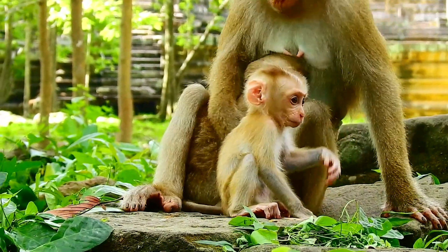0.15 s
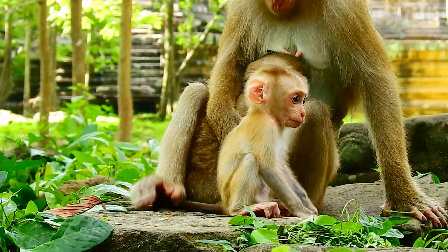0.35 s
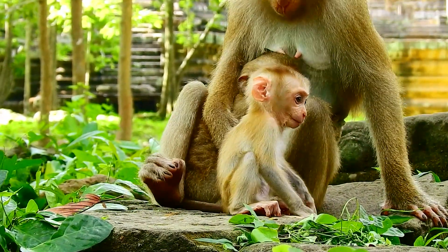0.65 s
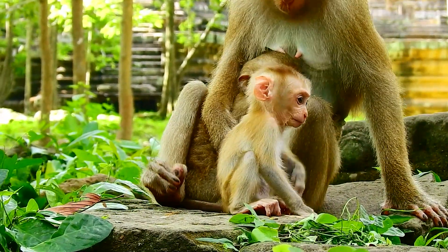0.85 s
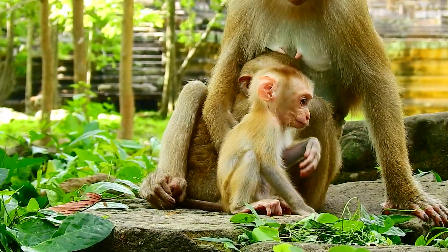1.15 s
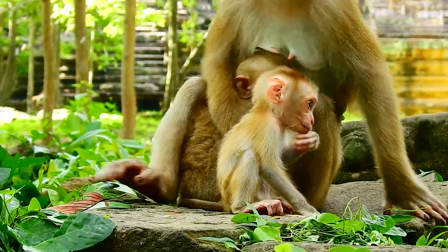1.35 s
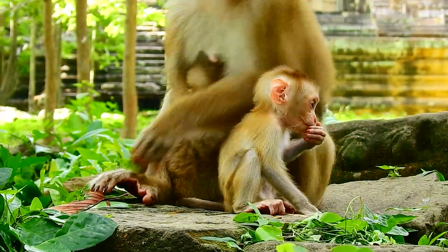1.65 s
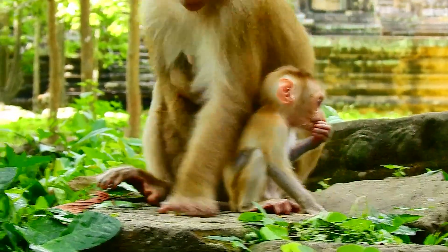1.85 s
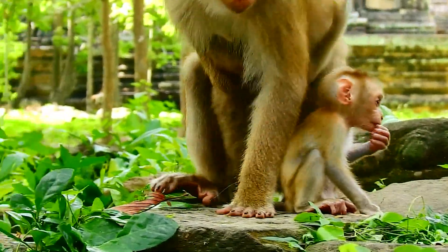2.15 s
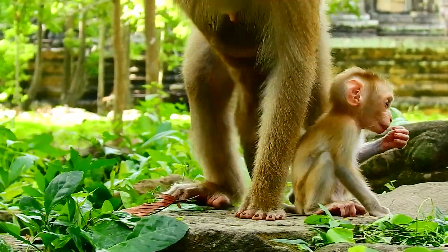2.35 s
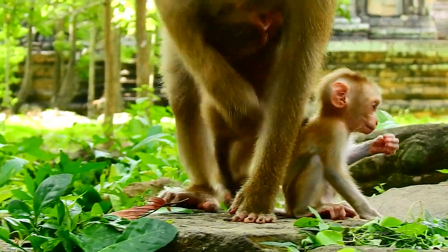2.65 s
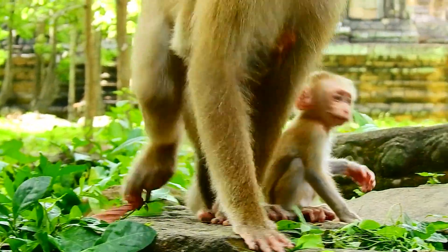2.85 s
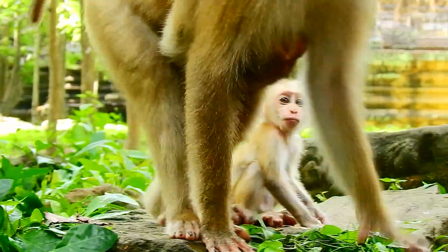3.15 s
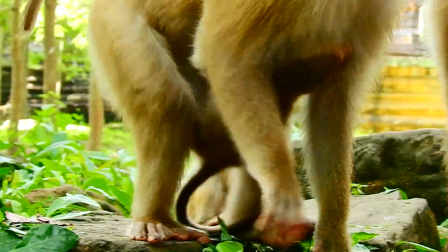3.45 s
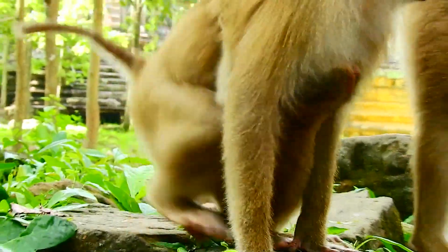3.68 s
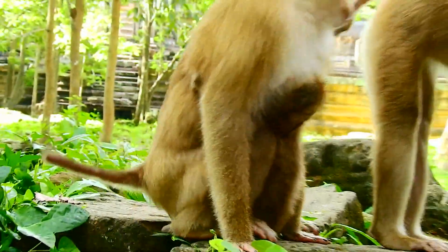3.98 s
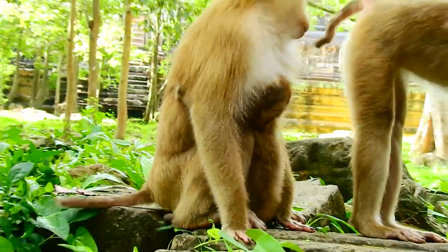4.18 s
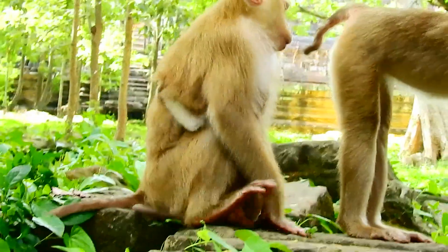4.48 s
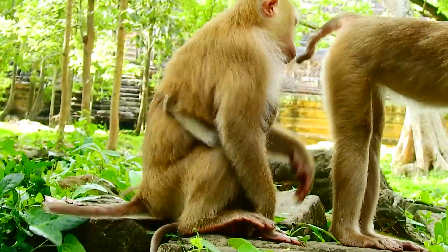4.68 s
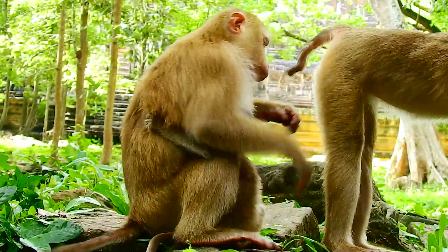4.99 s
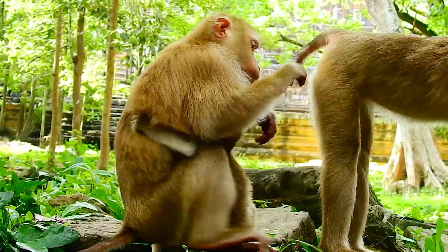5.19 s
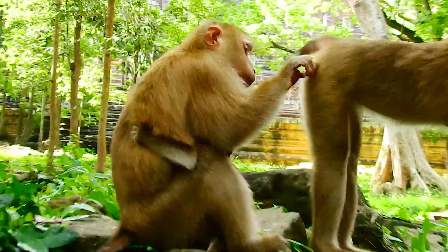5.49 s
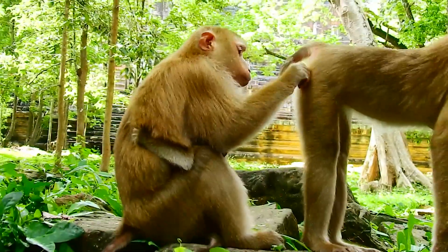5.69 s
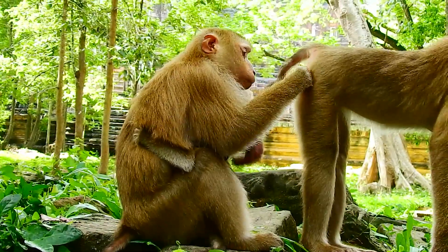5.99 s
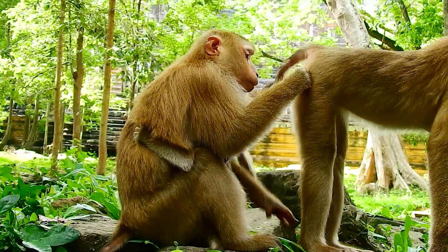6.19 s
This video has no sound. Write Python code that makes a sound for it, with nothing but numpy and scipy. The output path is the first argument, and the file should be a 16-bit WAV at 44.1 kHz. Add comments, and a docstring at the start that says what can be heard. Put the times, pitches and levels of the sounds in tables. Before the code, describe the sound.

A quiet forest, recorded close in stereo: low air rumble, faint hiss and a thin high cicada drone, strongest at the start. From 0 to 0.33 s an infant monkey gives a thin, wavering nasal whine. A harsh squeal at 0.34 s leaps into a piercing shriek, with another squeal at 0.53. Short chirps and a rising squeak follow around 0.8-1.1, then sparser chirps at 1.5, 1.75 and 2.5. A high whistle at 2.65 leads to a loud bright chirp at 2.9 and a rough upward scream at 2.97, with a last chirp at 3.1. A soft distant coo stretches from 3.5 to 4.2, a sharp knock on stone lands at 3.9, and light taps and scuffs continue to 6.1. Another dull coo comes at 5.1 and a faint rising call at 6.26. A distant bird repeats its whistled note from 0.6 to 2.5 and again from 4.4 to 5.8.

```python
"""Macaques squeak close by on a stone ledge: a thin whine, harsh shrieks, then short chirps and whistles.
Their voices are sums of harmonics shaped by throat and mouth, breaking into noise when rough.
Taps and scuffs are short bursts of shaped noise; softer, duller coos come from callers further off.
A bird repeats one whistled note, which rises, holds and drops, and cicadas drone in a narrow band.
Decaying noise gives the trees a light echo."""
import sys
import numpy as np
from scipy import signal
from scipy.fft import rfft, irfft
from scipy.io import wavfile

SR = 44100
rng = np.random.default_rng(int(sys.argv[2]) if len(sys.argv) > 2 else 0)


def dump(signal):
    """Clip the signal to [-1, 1] and save it as 16-bit WAV at the path in sys.argv[1]."""
    limited = np.clip(np.atleast_2d(signal).T, -1, 1)
    pcm = np.round(limited * 32767).astype(np.int16)
    wavfile.write(sys.argv[1], SR, pcm)


N = 279153  # length in samples


def undb(db):
    """Turn decibels into gain."""
    return 10 ** (np.asarray(db) / 20)


def unit(x):
    """Scale to an rms level of 1."""
    return x / (x.std() + 1e-12)


def along(hz, points):
    """Read (Hz, value) points on a log-frequency axis."""
    f, value = np.transpose(points)
    return np.interp(np.log(np.maximum(hz, 1)), np.log(f), value)


def noise(size, gain):
    """Noise of rms 1 whose spectrum follows gain(Hz)."""
    spectrum = rfft(rng.standard_normal(size)) * gain(np.fft.rfftfreq(size, 1 / SR))
    return unit(irfft(spectrum, size))


def wobble(size, rate_hz):
    """Random motion, mostly slower than about rate_hz."""
    return noise(size, lambda f: 1 / (1 + (f / rate_hz) ** 2))


def waver(s, rate_hz):
    """Random motion up to about rate_hz, read at the times s of one call."""
    return np.interp(s - s[0], np.arange(SR) / SR, wobble(SR, rate_hz))


def resonance(f, hz, width_hz):
    """Gain of one resonance, 1 at its centre."""
    return 1 / np.sqrt(1 + ((f * f - hz * hz) / (np.maximum(f, 1) * width_hz)) ** 2)


def add(track, s, sound):
    """Mix a sound into a track at time s."""
    start = int(np.clip(s * SR, 0, N - 1))
    track[start:start + len(sound)] += sound[:N - start]


# Colour of the forest air. Each row: frequency in Hz, relative strength in dB.
AIR_COLOUR = [(22, -45), (40, -10.5), (60, 3.5), (85, -5), (125, 2), (200, -11.5), (330, -22.5), (600, -26),
              (1200, -28.5), (2500, -30.5), (4400, -31.5), (5400, -23), (6500, -28.5), (7600, -27.5),
              (10000, -38), (15000, -59.5)]
# Colour of the cicada drone. Each row: frequency in Hz, relative strength in dB.
CICADA_COLOUR = [(7700, -39), (8000, -15.5), (8100, -11), (8350, -6.5), (8560, 2), (8700, -4.5), (8790, -1),
                 (8920, -29), (9150, -40)]
# How loud the cicada chorus is. Each row: time in seconds, level in dB around which it throbs.
CICADA_LEVEL = [(0, -57.5), (1.3, -64), (2.2, -64), (3.5, -63), (4.6, -65.5), (6.3, -64)]


def forest(air_db=-62.5, cicada_db=0, cicada_side_db=-7, throb_db=-0.5):
    """Low rumble and faint hiss of the open air, under a narrow band of throbbing cicadas."""
    f = np.fft.rfftfreq(N, 1 / SR)

    def spread(points, side_gain):
        """Stereo noise: a shared middle, plus a side part with opposite sign left and right."""
        gain = undb(along(f, points))
        mid, side = (rfft(rng.standard_normal(N)) * gain for _ in range(2))
        return unit(irfft(mid + side_gain * side * np.array([[1], [-1]]), N))

    # long waves are alike at both ports, short ones differ
    air = spread(AIR_COLOUR, np.minimum(f / 900, .55)) * undb(air_db + 0.67 * wobble(N, 1.8))
    level_db = np.interp(np.arange(N) / SR, *np.transpose(CICADA_LEVEL))
    chorus_db = level_db + cicada_db + throb_db * wobble(N, 40)
    return air + spread(CICADA_COLOUR, undb(cicada_side_db)) * undb(chorus_db)


def trees(x, t60_s, thin_hz, dull_hz):
    """Trunks and leaves scatter short waves best; the echoes differ at each ear."""
    t = np.arange(SR) / SR
    fade = undb(-60 * t / t60_s) * (1 - np.exp(-t / 0.0021))

    def colour(f):
        return f ** 2 / (f ** 2 + thin_hz ** 2) / np.hypot(1, f / dull_hz)

    tails = [fade * noise(SR, colour) for _ in range(2)]
    return np.array([signal.fftconvolve(x, tail / np.linalg.norm(tail))[:N] for tail in tails])


# The shape of one bird note.
# Each row: seconds from its start, share of the top pitch, level in dB relative to the note.
BIRD_NOTE = [(0, .82, -27), (0.024, .915, -6.5), (0.052, 1, -4.5), (0.076, 0.99, -2), (0.111, 1, -1),
             (.135, 0.95, -15), (0.161, 0.9, -46)]
# When the bird sings. Each row: start in seconds, top pitch in Hz before flutter, relative level in dB.
BIRD_TIMES = [(0.61, 3340, -48.5), (1.168, 3356, -49.5), (1.727, 3304, -45.5), (2.366, 3270, -47),
              (4.421, 3358, -51.5), (5.013, 3267, -50), (5.656, 3327, -52.5)]


def bird(flutter_db=1):
    """A nearly pure whistle that rises, holds and drops away, fluttering on its way through the leaves."""
    out = np.zeros(N)
    s, pitch, db = np.transpose(BIRD_NOTE)
    t = np.arange(int(s[-1] * SR)) / SR
    for start, top_hz, note_db in BIRD_TIMES:
        hz = top_hz * np.interp(t, s, pitch) * (1 + 0.0034 * wobble(len(t), 93))
        loudness = undb(note_db + np.interp(t, s, db) + flutter_db * wobble(len(t), 50))
        add(out, start, np.sqrt(2) * np.sin(2 * np.pi * np.cumsum(hz) / SR) * loudness)
    return out


TOP_HZ = 15600  # highest harmonic, and where the recorder cuts
MOUTH_WIDTH_HZ, MOUTH_DB = 600, 19.5  # half-width and height of the mouth resonance


def cry(rows, throat, breath, jitter_hz=190, unrest_hz=900, shimmer=0.34, hiss_treble_db=4):
    """Vocal folds drive throat and mouth; under strain their cycles turn uneven and break into noise."""
    s, *columns = np.transpose(rows)
    size = max(int((s[-1] - s[0]) * SR), 256)
    t = np.arange(size) / SR
    hz, db, rough, mouth_hz, treble_db = (np.interp(s[0] + t, s, c) for c in columns)
    rough = np.clip(rough, 0, 1)

    def tract(f, mouth, treble):
        """Gain of throat, mouth resonance and a treble step around 5200 Hz."""
        mouth_db = MOUTH_DB / (1 + ((f - mouth) / MOUTH_WIDTH_HZ) ** 2)
        step_db = treble / (1 + np.exp((5200 - f) / 350))
        return undb(along(f, throat) + mouth_db + step_db)

    harmonic = np.arange(1, 15)[:, None]
    uneven_hz = hz + jitter_hz * rough * wobble(size, unrest_hz)
    phase = 2 * np.pi * np.cumsum(uneven_hz) / SR
    weight = tract(harmonic * hz, mouth_hz, treble_db) * (harmonic * hz < TOP_HZ)
    tone = np.sqrt(2) * (weight * np.sin(harmonic * phase)).sum(0) / np.linalg.norm(weight, axis=0)

    # the noisy part is brighter than the tone and dies away below the pitch
    strain = rough * undb(db) + 1e-9
    pitch, mouth, treble = (np.average(c, weights=strain) for c in (hz, mouth_hz, treble_db))
    floor_hz = np.minimum(.85 * pitch, 4200)
    hiss = noise(size, lambda f: tract(f, mouth, treble + hiss_treble_db) * np.minimum(f / floor_hz, 1) ** 4)

    hiss_share = np.clip(np.hypot(breath, 1.1 * rough ** 1.2), 0, .92)
    flutter = np.exp(shimmer * rough * wobble(size, 430) - (shimmer * rough) ** 2)
    edges = np.clip(np.minimum(t, t[-1] - t) / 0.0012, 0, 1)
    voice = np.sqrt(1 - hiss_share ** 2) * tone + hiss_share * hiss
    return voice * flutter * edges * undb(db)


def voices(calls, throat, breath):
    """A series of cries from one kind of throat, thinned below the first frequency in its table."""
    out = np.zeros(N)
    for rows in calls:
        add(out, rows[0][0], cry(rows, throat, breath))
    return signal.sosfilt(signal.butter(4, throat[0][0], "high", fs=SR, output="sos"), out)


EDGE_DB = 15.5  # how far a call drops at its two ends


def arch(start, length, first_hz, middle_hz, last_hz, db, swell_db, attack, release):
    """Time, pitch and level of one call: a single bend in pitch; attack, a swelling or sinking hold, release."""
    u = np.linspace(0, 1, 64)
    hz = np.polyval(np.polyfit([0, .5, 1], [first_hz, middle_hz, last_hz], 2), u)
    ends = np.maximum(1 - u / attack, 0) ** 2 + np.maximum(1 - (1 - u) / release, 0) ** 2
    return start + length * u, hz, db + swell_db * (u - .5) - EDGE_DB * ends


def controls(s, hz, db, rough, mouth_hz, treble_db):
    """One cry as rows: seconds, pitch in Hz, level in dB, roughness, mouth resonance in Hz, treble in dB."""
    return np.column_stack(np.broadcast_arrays(s, hz, db, rough, mouth_hz, treble_db))


FAR_ROUGH, FAR_TREBLE_DB = 0.19, -14
FAR_WAVER, FAR_WAVER_HZ = 0.011, 14  # pitch waver as a share, and its rate


def far_call(row, attack=0.16, release=0.11):
    """A soft, dull coo whose pitch wavers a little."""
    *shape, mouth_hz = row
    s, hz, db = arch(*shape, attack, release)
    wavering_hz = hz * (1 + FAR_WAVER * waver(s, FAR_WAVER_HZ))
    return controls(s, wavering_hz, db, FAR_ROUGH, mouth_hz, FAR_TREBLE_DB)


# Calls from further off. Each row: start in seconds, length in seconds, pitch in Hz at start, middle
# and end before wavering, relative level in dB, swell in dB, mouth resonance in Hz.
FAR_CALLS = [ (1.943, 0.24, 510, 475, 477.4, -73.5, -12, 1396),
             (3.478, 0.73, 1052, 1061, 1062, -65.5, -7.5, 1050),
             (5.076, 0.15, 717, 697, 560, -66, -16.5, 1197), (6.263, .08, 1530, 1965, 2630, -65, 0, 2100)]
# Throat colour of the distant callers. Each row: frequency in Hz, relative strength in dB.
FAR_THROAT = [(450, 4), (1000, -2.5), (2000, -17.5), (3500, -13.5), (8000, -38)]


def far_callers():
    """Distant monkeys call with a breathy voice, its harmonics coloured by their own throat."""
    return voices(map(far_call, FAR_CALLS), FAR_THROAT, breath=0.12)


# Hands and feet on the ledge. Each row: start in seconds, relative knock level in dB, knock pitch in Hz,
# relative tick level in dB, relative thud level in dB.
TAPS = [(1.274, -52, 925, -65, -77), (3.491, -59, 640, -82.5, -47), (3.548, -46, 895, -70, -44),
        (3.902, -29.5, 1094, -30, -43.5), (4.569, -48, 930, -54, -54.5), (4.756, -84, 1498, -55, -77),
        (5.186, -46, 1220, -37.5, -43.5), (5.468, -48, 641, -63, -66), (5.802, -44.5, 1444, -77, -46),
        (6.074, -49, 630, -58, -52.5)]
# What a tap rings with. Each row: multiple of the knock pitch, width as a share of its own pitch
# (the peak is then squared, so sharper), relative strength in dB.
KNOCK_RINGS = [(0.699, 0.18, 0), (1.001, 0.24, 10.5), (1.498, 0.1, -39), (1.899, 0.39, -11),
               (2.8, 0.16, -17), (4, 0.25, -18)]
# Fur and limbs brushing over stone and leaves. Each row: start in seconds, length in seconds,
# centre in Hz, width in Hz before squaring, relative level in dB.
SCUFFS = [(3.774, 0.057, 352, 119, -58.5), (3.802, 0.19, 1870, 498, -64.5), (4.308, 0.053, 966, 348, -65),
          (4.414, 0.066, 1200, 700, -63), (4.454, 0.062, 900, 402, -60), (4.58, 0.084, 400, 164, -61),
          (5.182, 0.018, 1930, 915, -44), (5.416, 0.18, 1004, 345, -63.5), (5.458, 0.14, 505, 304, -60),
          (5.663, 0.061, 900, 298, -66), (5.754, 0.074, 1060, 298, -59), (5.815, 0.051, 1090, 888, -59.5),
          (5.972, 0.22, 2700, 704, -67), (6.074, 0.045, 538, 302, -64)]


def movements(knock_s=0.0096, tick_s=0.004, thud_hz=235, thud_s=0.019):
    """Each tap is a short knock, a gritty tick and a late low thud; scuffs swell and fade."""
    out = np.zeros(N)
    t = np.arange(SR // 6) / SR
    contact = np.minimum(t / 0.001, 1)
    knock_fade = np.exp(-(t / knock_s) ** 2 / 2)
    tick_fade = np.exp(-(t / tick_s) ** 2 / 2)
    thud_swell = np.exp(-t / thud_s) * np.minimum(t / 0.0087, 1) * 1.53
    for s, knock_db, hz, tick_db, thud_db in TAPS:
        knock = noise(len(t), lambda f: sum(
            undb(db) * resonance(f, m * hz, w * m * hz) ** 2 for m, w, db in KNOCK_RINGS))
        tick = noise(len(t), lambda f: resonance(f, 5800, 7100) ** 2 / (1 + (f / 10500) ** 8))
        thump = noise(len(t), lambda f: resonance(f, 288, 540) ** 2)
        thud = np.sin(2 * np.pi * thud_hz * t) + .5 * thump
        add(out, s, contact * undb(knock_db) * knock * knock_fade)
        add(out, s, contact * undb(tick_db) * tick * tick_fade)
        add(out, s, undb(thud_db) * thud * thud_swell)
    for s, length, hz, width_hz, db in SCUFFS:
        size = int(length * SR)
        brush = noise(size, lambda f: resonance(f, hz, width_hz) ** 2)
        add(out, s, undb(db + 3.15 * wobble(size, 39)) * signal.windows.tukey(size, .7) * brush)
    return out


WHINE_MOUTH_HZ = 4580
WHINE_ROUGH, WHINE_TREBLE_DB = 0.13, 5.5  # as it begins
WHINE_CALM_S, WHINE_DULL_DB_PER_S = .3, 30  # it turns cleaner and duller as it goes on
WHINE_FADE_DB, WHINE_FADE_S = 5, 0.014  # it dies away at the end
# An infant's whine. Each row: time in seconds, pitch in Hz, relative level in dB before the end fade.
WHINE = [(0.0, 997, -38), (0.014, 1005, -45.5), (0.024, 970.7, -43.5), (0.034, 970, -45.5),
         (0.07, 1077, -38.5), (0.108, 1026, -47.5), (0.19, 1130, -42), (0.228, 1117, -49.5),
         (0.254, 1088, -41.5), (0.3, 1094, -45.5), (0.316, 1045, -45.5), (0.33, 970, -38)]
# Throat colour of the infant. Each row: frequency in Hz, relative strength in dB.
INFANT_THROAT = [(1050, -13), (2150, -22.5), (3300, -13), (4300, -9.5), (5400, -30.5), (6500, -14.5),
                 (7600, -6), (8700, -13), (10800, -6), (13000, -14.5), (15500, -28.5)]


def whine():
    """The infant holds its mouth still while the strain ebbs away."""
    s, hz, db = np.transpose(WHINE)
    fade_db = WHINE_FADE_DB * np.exp((s - s[-1]) / WHINE_FADE_S)
    rough = WHINE_ROUGH * np.exp(-s / WHINE_CALM_S)
    treble_db = WHINE_TREBLE_DB - WHINE_DULL_DB_PER_S * s
    rows = controls(s, hz, db - fade_db, rough, WHINE_MOUTH_HZ, treble_db)
    return voices([rows], INFANT_THROAT, breath=0.07)


TREMOR_HZ, TREMOR_SHARE, TREMOR_DB = 54.6, .008, 2.52  # rate, share of pitch, change in level


def tremble(s, hz, db):
    """Unsteady effort moves pitch and level together."""
    effort = waver(s, TREMOR_HZ)
    return s, hz * (1 + TREMOR_SHARE * effort), db + TREMOR_DB * effort


CHIRP_ATTACK, CHIRP_RELEASE = 0.3, 0.46  # shares of its length
MOUTH_FOLLOW = 2.2  # octaves that the mouth resonance moves per octave of pitch
CHIRP_FRAY = .8  # roughness grows through a chirp by this share


def chirp(row):
    """The mouth opens and closes with the pitch, and the voice frays towards the end."""
    *shape, rough, mouth_hz, treble_db = row
    s, hz, db = tremble(*arch(*shape, CHIRP_ATTACK, CHIRP_RELEASE))
    fray = 1 + CHIRP_FRAY * np.linspace(-.5, .5, len(s))
    moving_mouth_hz = mouth_hz * (hz / np.median(hz)) ** MOUTH_FOLLOW
    return controls(s, hz, db, rough * fray, moving_mouth_hz, treble_db)


WIDEST_MOUTH_HZ = 4600  # the mouth follows the pitch until it can open no further
HIGH_PITCH_HZ, HIGH_TREBLE_DB, BRIGHTEN_DB_PER_OCTAVE = 4540, -7.5, 26  # treble at that pitch, and its climb


def high_register(s, hz, db, rough):
    """The mouth rings on the pitch up to its widest opening, and the voice brightens as it climbs."""
    treble_db = HIGH_TREBLE_DB + BRIGHTEN_DB_PER_OCTAVE * np.log2(hz / HIGH_PITCH_HZ)
    return controls(s, hz, db, rough, np.minimum(hz, WIDEST_MOUTH_HZ), treble_db)


SQUEAL_ATTACK, SQUEAL_RELEASE = .18, 0.35  # shares of its length


def squeal(row):
    """A short burst on nearly one pitch, harsher the rougher it is."""
    *shape, rough = row
    return high_register(*tremble(*arch(*shape, SQUEAL_ATTACK, SQUEAL_RELEASE)), rough)


# Short chirps in the low register. Each row: start in seconds, length in seconds, pitch in Hz at start,
# middle and end before trembling, relative level in dB, swell in dB, mean roughness from 0 to 1,
# mouth resonance in Hz at the median pitch, treble in dB.
CHIRPS = [ (0.536, 0.021, 1674, 1553, 1310, -40, -15.5, 0.52, 3080, -13.5),
          (0.815, 0.04, 1010, 1088, 1108, -35.5, 9, .12, 3000, -4),
          (1.087, 0.027, 1386, 1345, 1223, -39, -7, 0.3, 4050, -18.5),
          (1.52, 0.046, 1154, 1553, 1530, -31.5, 3.5, 0.18, 2580, 2),
          (1.74, 0.026, 1690, 1534, 1290, -35, -6.5, 0.24, 3050, -6.5),
          (2.479, 0.033, 1182, 1398, 1407, -31, 11, 0.15, 1550, 16.5),
          (2.741, 0.03, 1370, 1210, 1003, -39, 10, .15, 2590, -20),
          (2.815, 0.009, 1090, 1130, 1080, -39, -8, 0.29, 2037, -27),
          (2.906, 0.07, 1260, 1588, 1687, -22.5, 2.5, 0.11, 4300, 1.5),
          (3.099, .034, 1420, 1256, 975, -27.5, 0, .22, 3700, -1)]
# Squeals in the high register. Each row: start in seconds, length in seconds, pitch in Hz at start,
# middle and end before trembling, relative level in dB, swell in dB, roughness from 0 to 1.
SQUEALS = [ (0.341, 0.055, 4382, 4235, 4430, -22.5, -1.5, 0.7),
           (0.527, 0.031, 3984, 4380, 4300, -26.5, -11, 0.33),
           (1.039, 0.011, 7250, 6830, 6500, -43, 0, 0.2)]
# Long screams and whistles, mostly gliding upward, one list of rows for each.
# Each row: time in seconds, pitch in Hz, relative level in dB, roughness from 0 to 1.
SCREAMS = [
    [(.417, 4000, -24.5, 0.5), (.426, 4510, -28, 0.25), (.436, 6200, -22.5, 0.76), (.452, 8340, -27, 0.85),
     (.469, 8790, -26, 0.22), (.481, 8570, -24, 0.03), (.496, 8860, -31, 0.2), (.506, 9050, -40, 0.1)],
    [(.896, 3737, -28.5, 0.54), (.907, 3790, -21.5, 0.23), (.936, 4360, -30.5, 0.47),
     (.944, 6100, -40, 0.4), (.951, 6650, -24.5, 0.1), (.96, 7350, -42, 0.3), (.972, 7080, -29, 0.3)],
    [(2.64, 7140, -26.5, 0), (2.651, 7210, -26.5, 0), (2.664, 8020, -27.5, 0.04), (2.673, 7920, -37.5, 0),
     (2.694, 8430, -28, 0.05), (2.7, 7570, -37, 0.26)],
    [(2.965, 3136, -22.5, 0.16), (2.975, 3540, -26.5, 0.77), (2.987, 4440, -24.5, 0.95),
     (2.997, 4900, -25, .8), (3.005, 5950, -30, .55), (3.015, 6050, -40, 0.2)],
]
# Throat colour of the close squeakers. Each row: frequency in Hz, relative strength in dB.
CLOSE_THROAT = [(750, -24), (1100, -3.5), (1600, -12), (2200, -5.5), (3300, -11.5), (4300, -8),
                (5200, -17.5), (6500, 6.5), (7700, 5), (9000, -0.5), (10500, -13), (12000, -18.5),
                (15000, -48.5)]


def squeaks():
    """Close chirps, squeals and screams: one throat in a low and a high register, with hardly any breath."""
    chirps = [chirp(row) for row in CHIRPS]
    squeals = [squeal(row) for row in SQUEALS]
    screams = [high_register(*np.transpose(curve)) for curve in SCREAMS]
    return voices(chirps + squeals + screams, CLOSE_THROAT, breath=0.0073)


def ledge(x, lag_s=.0021, bounce=0.48):
    """A quick bounce off the stone makes gliding harmonics swell and sink."""
    t = np.arange(N) / SR
    return x + bounce * np.interp(t - lag_s, t, x, left=0)


# Timing between the two microphone ports. Each row: frequency in Hz, radians by which left leads.
PORT_PHASE = [(100, 0.3), (1200, 0.26), (2200, 0.2), (4200, 0.43), (8000, 1.04), (15000, 0.73)]
# Balance between the ports. Each row: frequency in Hz, left minus right in dB.
PORT_BALANCE = [(100, 1.6), (450, 3.7), (1000, .4), (2000, 1.2), (4000, .1), (8000, .5)]


def ports(x):
    """Direct sound reaches the two microphone ports with slightly different phase and level."""
    f = np.fft.rfftfreq(N, 1 / SR)
    half = undb(along(f, PORT_BALANCE) / 2) * np.exp(.5j * along(f, PORT_PHASE))
    return irfft(rfft(x) * np.array([half, 1 / half]), N)


def scene(near_echo_db=-18, far_echo_db=-6, far_db=-1):
    """Close monkeys are nearly dry; the bird and distant callers ring on between the trees."""
    far = bird() + far_callers()
    taps = movements()
    cries = whine() + squeaks()
    direct = ports(ledge(cries) + taps + undb(far_db) * far)
    near_echo = undb(near_echo_db) * trees(cries + taps, t60_s=0.46, thin_hz=2460, dull_hz=6400)
    far_echo = undb(far_echo_db) * trees(far, t60_s=0.96, thin_hz=301, dull_hz=6000)
    return direct + near_echo + far_echo + forest()


TREBLE_SPLIT_HZ, TREBLE_LAG_S = 4900, .0085


def record(dry):
    """The recorder passes the treble a few milliseconds late and cuts the top."""
    f = np.fft.rfftfreq(N + SR, 1 / SR)
    low = 1 / (1 + (f / TREBLE_SPLIT_HZ) ** 60)
    delay = np.exp(-2j * np.pi * f * TREBLE_LAG_S)
    late = irfft(rfft(dry, N + SR) * (low + (1 - low) * delay), N + SR)[:, :N]
    return signal.sosfilt(signal.ellip(8, .2, 70, TOP_HZ, fs=SR, output="sos"), late)


dry = scene()
out = record(dry)
dump(out)
```